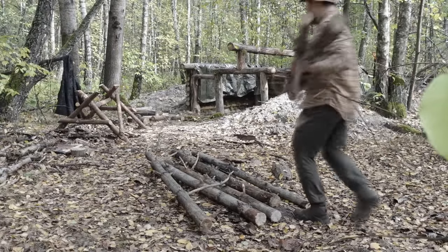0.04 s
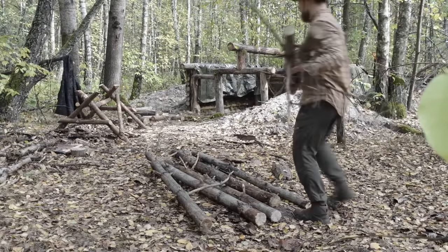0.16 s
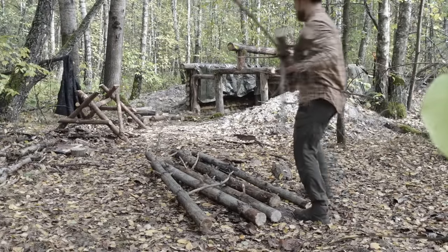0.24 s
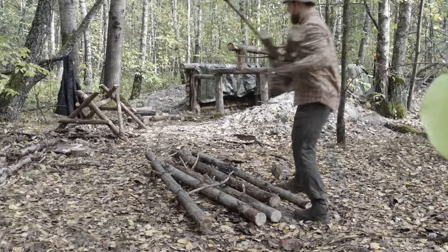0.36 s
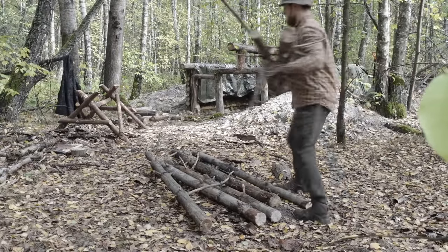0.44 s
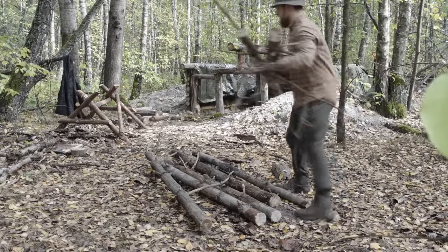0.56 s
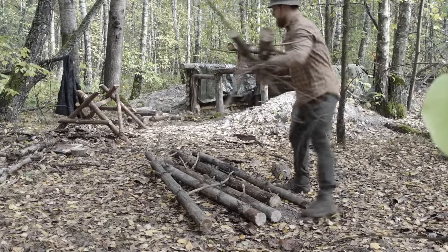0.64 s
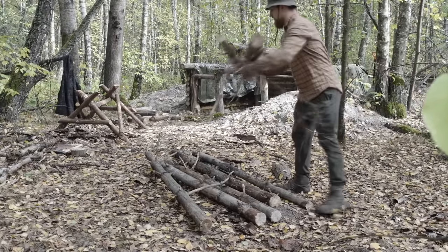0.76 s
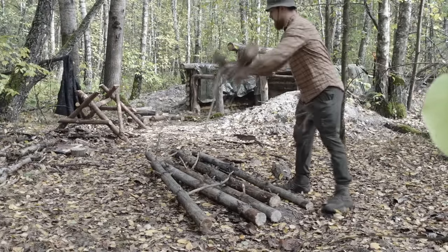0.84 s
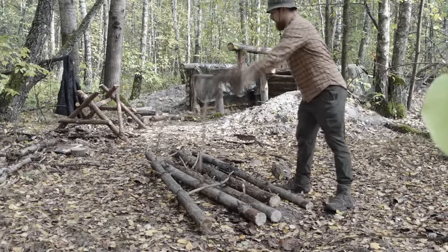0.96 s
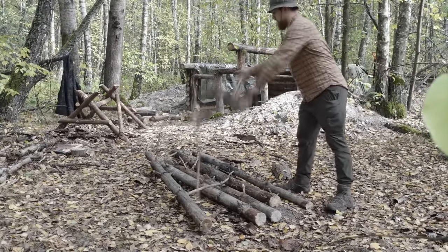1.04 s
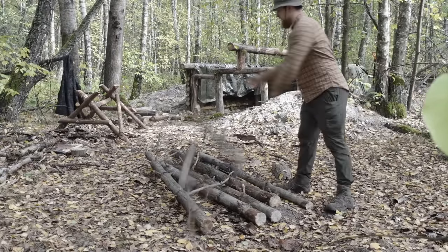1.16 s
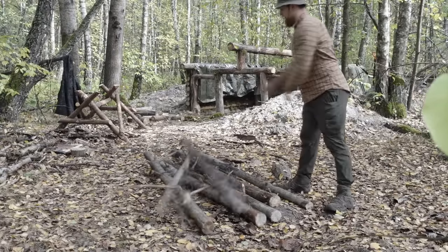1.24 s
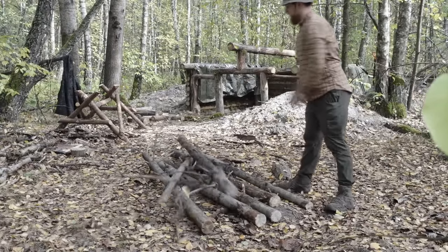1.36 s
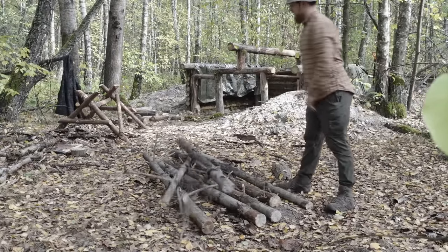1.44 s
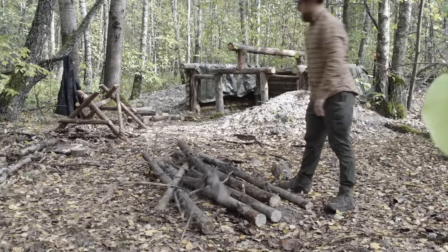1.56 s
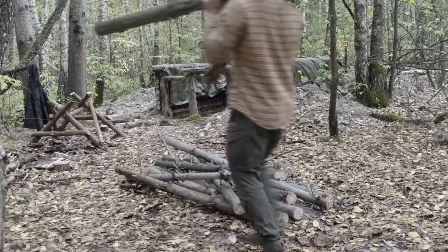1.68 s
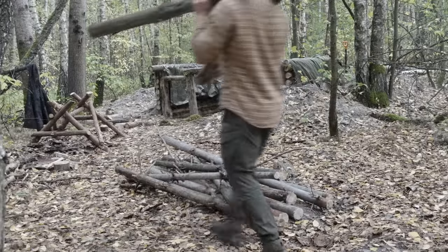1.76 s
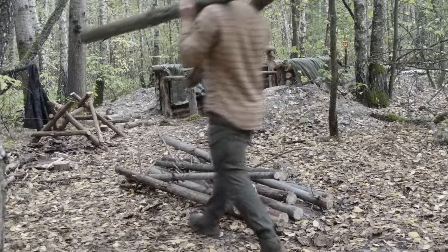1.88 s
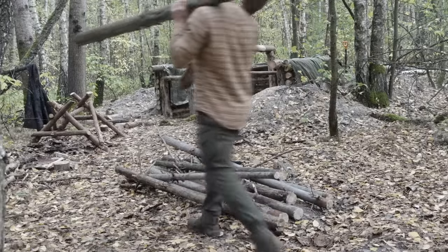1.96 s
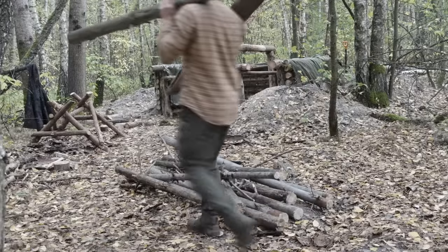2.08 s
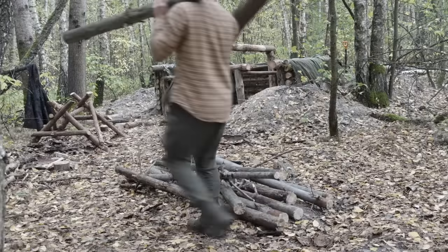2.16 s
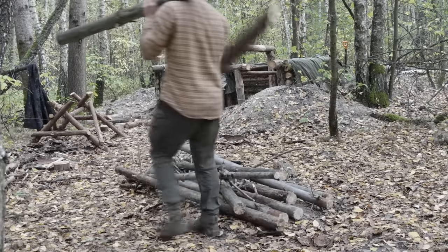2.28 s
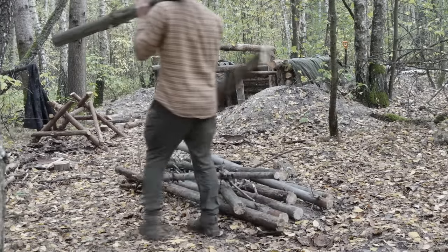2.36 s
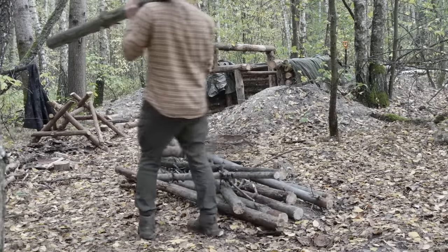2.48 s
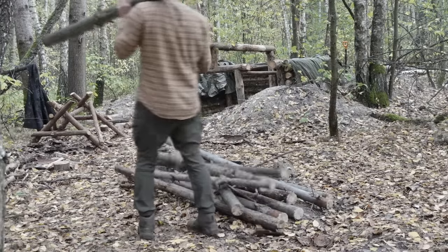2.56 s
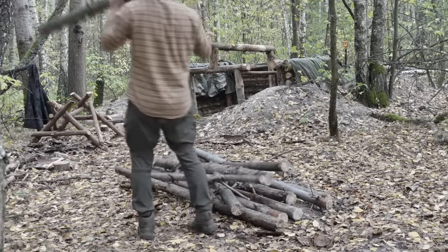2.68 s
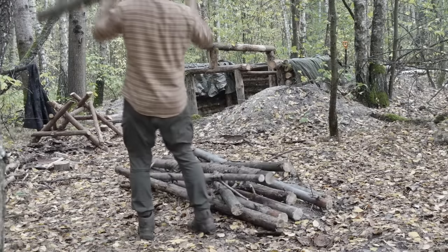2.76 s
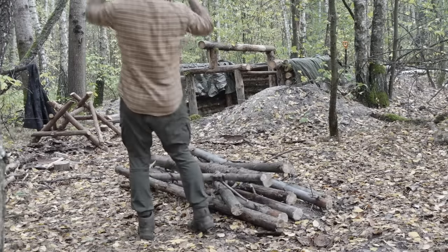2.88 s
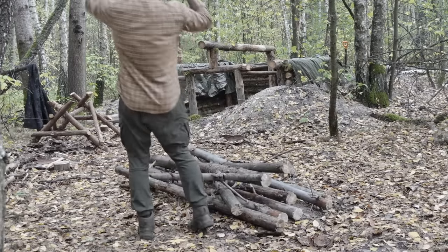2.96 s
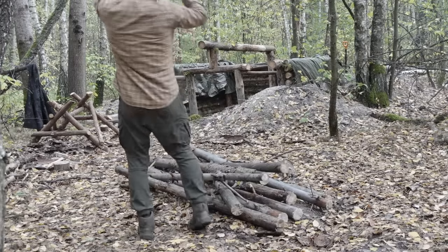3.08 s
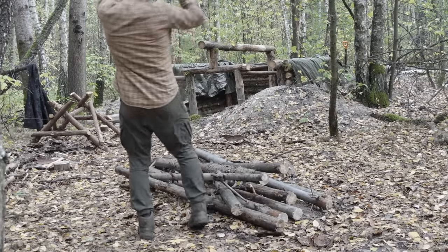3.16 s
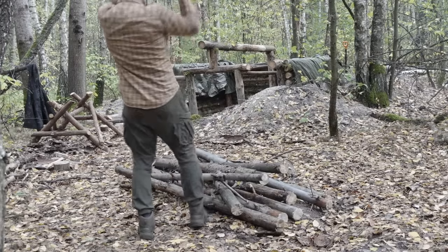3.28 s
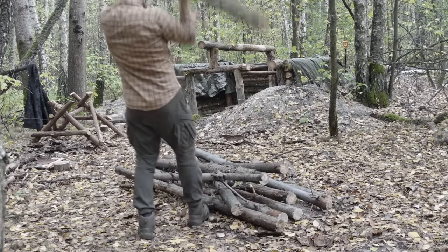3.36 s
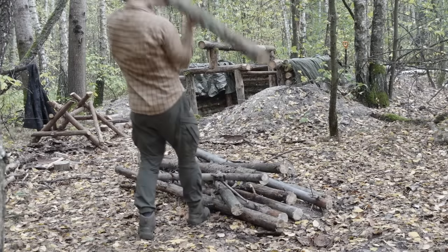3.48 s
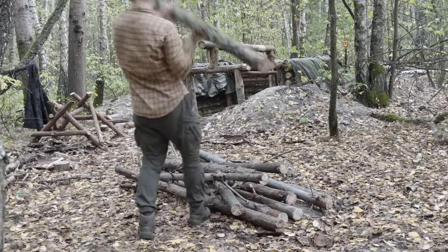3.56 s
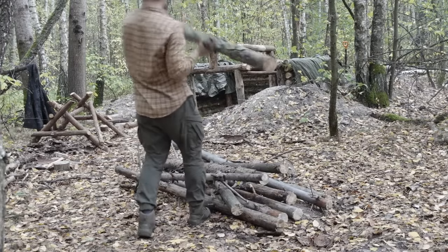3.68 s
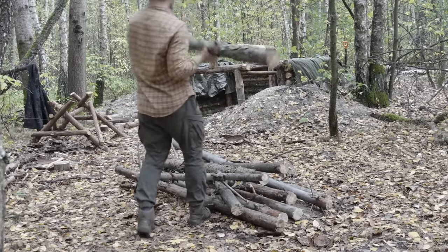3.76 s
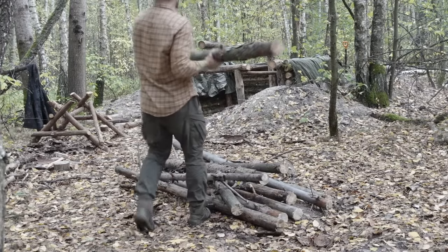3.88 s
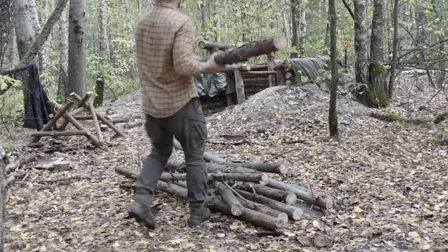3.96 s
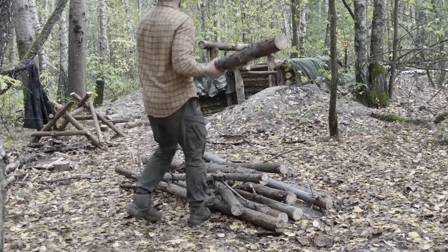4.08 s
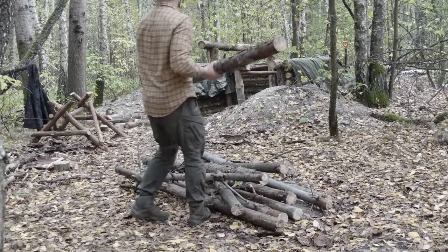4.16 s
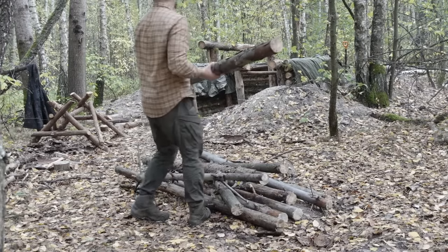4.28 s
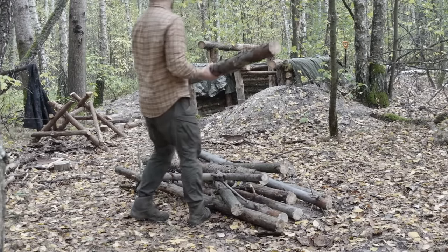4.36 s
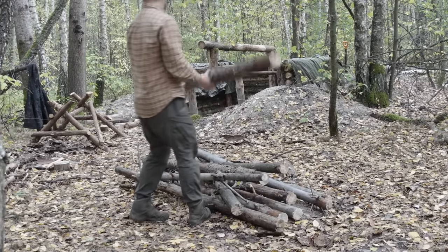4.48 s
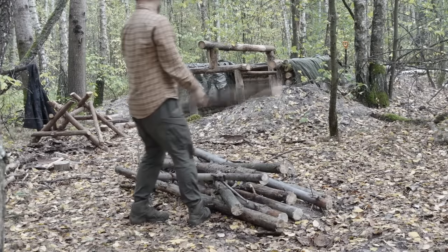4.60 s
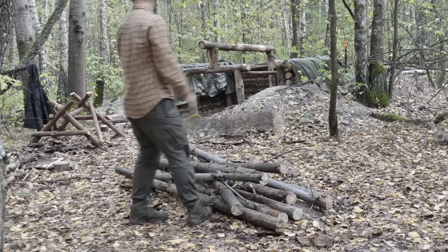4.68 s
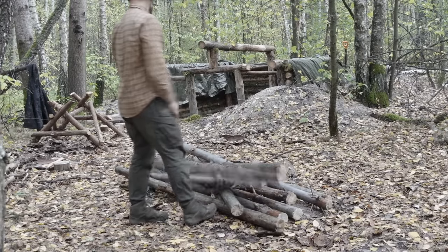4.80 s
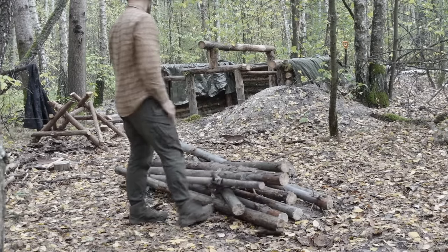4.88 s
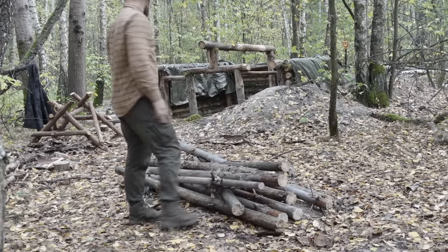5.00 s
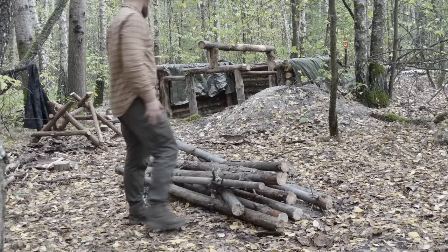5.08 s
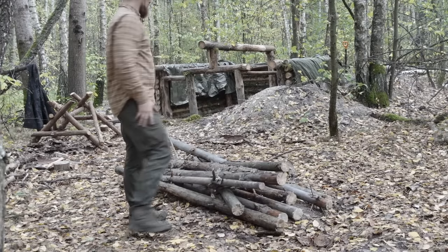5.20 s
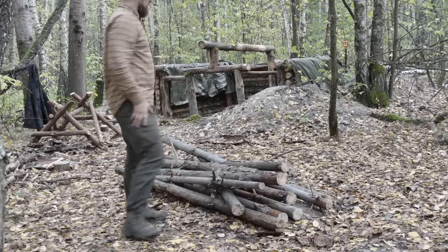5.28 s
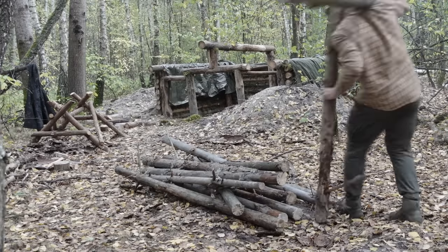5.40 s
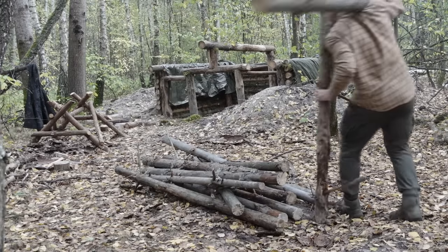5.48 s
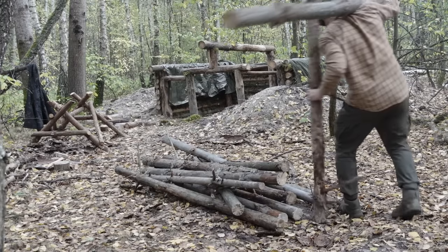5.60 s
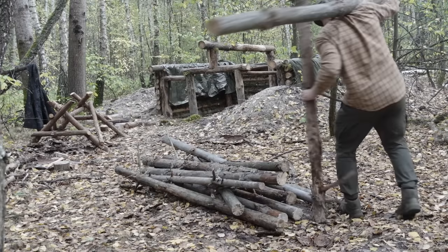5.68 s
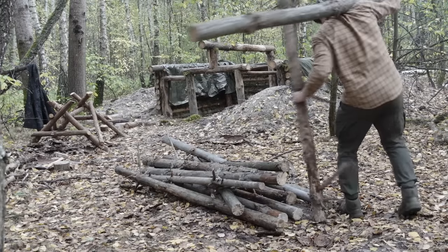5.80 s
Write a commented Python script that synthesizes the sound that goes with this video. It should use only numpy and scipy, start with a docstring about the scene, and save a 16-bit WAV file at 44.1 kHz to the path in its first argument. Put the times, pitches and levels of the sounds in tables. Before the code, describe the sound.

In a quiet forest, three logs are tossed one at a time onto a pile a few metres from the microphone. Each hits with a quick run of sharp, briefly ringing wooden knocks, a crackle of bark and a slight thud, followed by a short echo. The first two come close together and the last after a pause. Soft steps in dry leaves and a faint hush of air fill the gaps.

```python
"""Three loud wooden clatters: logs thrown one by one onto a pile in a forest, a few metres away.
Each log lands in a run of knocks that ring its bending modes and shake the pile, while bark cracks
at the contacts and the pile thuds on the soil. Boots and wood stir dry leaves, a log slides off a
shoulder, and the trunks scatter the blows back over a faint hush of air."""
import sys
import numpy as np
from scipy import signal
from scipy.fft import rfft, irfft
from scipy.io import wavfile

SR = 44100
rng = np.random.default_rng(int(sys.argv[2]) if len(sys.argv) > 2 else 0)


def pcm_store(signal):
    """Save signal as 16-bit PCM."""
    levels = np.round(np.clip(np.atleast_2d(signal), -1, 1) * 32767)
    wavfile.write(sys.argv[1], SR, levels.astype(np.int16).T)


N = 257544
TIME = np.arange(N) / SR
AGE = TIME[:SR]  # one second after a blow
MUTE_START_S, MUTE_END_S = 1.68, 2.5  # clatter silent between the first two throws


# Wood-on-wood contacts, harder is higher: start_s, level_db, pitch_hz, ring_db
LOG_KNOCKS = [ (0.445, -28.5, 606, -19.5), (0.462, -30, 1020, -29), (1.211, -29, 1330, -19),
              (1.242, -28, 754, -10.5), (1.2937, -0.5, 514, -19.5), (1.345, 1.5, 480, -9.5),
              (1.351, -6.5, 285, -16), (1.358, -8.5, 810, -14), (1.382, -5.5, 470, -27),
              (1.462, -17, 2940, -14), (1.4703, -13, 2120, -17), (1.476, -20.5, 730, -12.5),
              (1.607, -36, 430, -18), (1.666, -33.5, 700, -18), (2.519, -14, 298, -12.5),
              (2.535, -12.5, 840, -17), (2.55, -15, 840, -10), (2.617, -11, 470, -33),
              (2.6233, -3, 390, -19), (2.635, -11, 960, -10), (2.649, -3, 1880, -8.5),
              (2.664, -8.5, 855, -9.5), (2.693, -8.5, 540, -14), (2.7104, -10.5, 2050, -14),
              (2.7131, -3.5, 1370, -21.5), (2.748, -24, 1700, -16), (2.789, -18, 407, -23.5),
              (2.817, -26.5, 1450, -3.5), (2.893, -33.5, 1240, -15.5), (2.920, -32.5, 1340, -10.5),
              (3.116, -29, 1155, 4.5), (3.133, -34.5, 530, 6), (3.155, -35, 1084, -3),
              (4.890, -17, 724, -3.5), (4.896, -4, 570, -26), (4.908, -5.5, 1100, -9),
              (4.911, -6.5, 416, -9.5), (4.921, -4.5, 1390, -11), (4.9278, -1.5, 637, -14.5),
              (4.9333, -13, 785, -15), (4.950, -12.5, 525, -6), (4.970, -17.5, 1290, -38),
              (4.988, -19.5, 335, -8)]
# Bending and twisting modes of each thrown log: mode_hz, level_db, t60_s
FIRST_LOG_MODES = [(215.3, -12.5, 0.51), (271, 4.5, .19), (326, -14.5, 0.16), (374, -8.5, .15),
                   (442, 3, .18), (468.3, -5, 0.24), (652, -9, .16), (725, -9, 0.3), (839, 0.5, 0.1444),
                   (940.8, -10.5, .17), (1070, -6.5, 0.048), (1543, -16.5, .13), (2100, -5, 0.082),
                   (2530, -8, .11)]
SECOND_LOG_MODES = [(173, -9, 0.52), (234.2, -4, 0.39), (284, 4.5, .16), (333, -2, 0.069),
                    (399.5, -4, 0.55), (435, -7, .22), (502, 0.5, .15), (564, 4.5, 0.11), (694, -0.5, 0.24),
                    (1127, -1.5, 0.077), (1292, -8.5, 0.069), (1290, -1.5, 0.081), (1746, -9, 0.13),
                    (2270, -8.5, .12)]
THIRD_LOG_MODES = [(183.7, -17, .22), (345.3, -12, 0.39), (384, -8, 0.066), (452, -13.5, 0.18),
                   (537.2, 9, 0.091), (712, -15, 0.14), (834, -4, 0.16), (1140, 0.5, 0.068),
                   (1330, -5, 0.092), (1522, -14, 0.13), (1790, -4.5, 0.06), (1965, -7, .12),
                   (2125, -5.5, .09), (2440, -12, 0.063)]
# Modes of the logs bumping on the shoulder: mode_hz, level_db, t60_s
CARRIED_LOG_MODES = [(455, -5, 0.08), (564, -4, 0.15), (835, -16, 0.11), (1035, 1, 0.045),
                     (1310, -4.5, 0.039), (1492, -5, .08)]
# Handover to the next log: start_s
LOG_CHANGES_S = [2.0, 3.05, 4.0]

def logs():
    """Each knock rings the log moving at the time, which then rebounds."""
    modes_in_turn = (FIRST_LOG_MODES, SECOND_LOG_MODES, CARRIED_LOG_MODES, THIRD_LOG_MODES)
    out = np.zeros(N)
    for start_s, level_db, pitch_hz, ring_db in LOG_KNOCKS:
        modes = modes_in_turn[np.searchsorted(LOG_CHANGES_S, start_s)]
        add(out, start_s, undb(level_db) * (knock(pitch_hz, ring_db, modes) + rebounds(pitch_hz)))
    return out


def knock(pitch_hz, ring_db, modes, pile_db=-16, pile_t60_s=0.075, radiate_hz=215):
    """One blow: a short thock, the dense damped modes of the pile and the ring of the log."""
    cycles = 0.75 * max(pitch_hz / 500, 1) ** 0.3  # hard contacts swing for more cycles
    swing = AGE * pitch_hz / cycles
    thock = swing * np.exp((1 - swing ** 2) / 2) * sine(pitch_hz)
    onset = 1 - np.exp(-swing ** 2)
    pile = undb(pile_db) * band(rng.standard_normal(len(AGE)), pitch_hz, q=0.83) * fade(pile_t60_s)
    # a slim log radiates little bass
    highpass = signal.butter(3, radiate_hz, "high", fs=SR, output="sos")
    contact = signal.sosfilt(highpass, thock + onset * pile)
    # modes near the contact pitch are driven hardest
    ring = sum(undb(level_db) * resonance(mode_hz, pitch_hz, q=0.9) * fade(t60_s) * sine(mode_hz)
               for mode_hz, level_db, t60_s in modes)
    return contact + onset * undb(ring_db) * ring


def rebounds(pitch_hz, count=2, mean_gap_s=0.011, step_db=-12.5, spread_octaves=0.68):
    """The log chatters after a knock: quick, ever weaker contacts, too light to ring it."""
    rebound_hz = pitch_hz * 2 ** (spread_octaves * rng.uniform(-1, 1))
    gaps_s = mean_gap_s * rng.uniform(0.5, 1.5, count)
    contact = knock(rebound_hz, ring_db=0, modes=[])
    out = np.zeros(N)
    for k, start_s in enumerate(np.cumsum(gaps_s)):
        add(out, start_s, undb(step_db * (k + 0.5)) * contact)
    return out[:len(AGE)]


# Bark splitting, twigs snapping: start_s, level_db, centre_hz, length_s
BARK_CRACKS = [ (0.263, -42, 2060, 0.0038), (0.4627, -29, 2786, 0.0023), (1.21, -26.5, 4100, 0.0036),
               (1.233, -26.5, 4700, 0.023), (1.257, -23, 3900, 0.015), (1.316, -2, 5000, 0.0035),
               (1.323, -1.5, 5560, 0.00079), (1.339, -9, 2400, 0.0034), (1.354, -6, 6300, .004),
               (1.36, -7.5, 3800, 0.0039), (1.602, -33.5, 5880, 0.012), (2.529, -18.5, 3060, 0.0055),
               (2.6197, -1, 4170, 0.0053), (2.643, -8.5, 4850, 0.0082), (2.66, -5.5, 11000, 0.00044),
               (2.663, -15.5, 3200, 0.005), (3.424, -28, 2620, 0.0035), (3.604, -33.5, 6740, 0.00093),
               (4.533, -48.5, 6840, 0.0038), (4.742, -42, 7360, .0016), (4.887, -24, 6200, 0.013),
               (4.91, -7, 3220, 0.0037), (4.9182, -3, 4130, 0.0058), (4.932, -8.5, 2820, 0.0046),
               (4.945, -12.5, 2510, 0.0054)]
# Colour of cracking bark: freq_hz, gain_db
BARK_SPECTRUM = [(300, 21.5), (3300, -0.5), (4500, -4), (6000, -2), (7200, -7.5), (8700, -3),
                 (10200, -12.5), (13000, -3), (16000, -12)]

def bark(crush_db=-17, crush_hz=2900, crush_s=0.006, splinter_db=-17):
    """Breaking fibres build to a snap and trail splinters; every knock also crushes a little bark."""
    out, age = np.zeros(N), AGE[:SR // 10]
    crushes = [(start_s, level_db + crush_db, crush_hz, crush_s)
               for start_s, level_db, _, _ in LOG_KNOCKS]
    for start_s, level_db, centre_hz, length_s in BARK_CRACKS + crushes:
        clicks = grains(len(age), spread_db=3.5)
        fibres = colour(band(clicks, centre_hz, q=0.52), BARK_SPECTRUM)
        build = age / (0.47 * length_s)
        snap = build * np.exp(-build ** 2 / 2)
        splinters = undb(splinter_db) * np.minimum(build, 1) * np.exp(-age / (6.7 * length_s))
        add(out, start_s, undb(level_db) * fibres * (snap + splinters))
    return out


# Bounces of the whole pile: start_s, level_db, pitch_hz
PILE_THUDS = [(1.359, -27, 97), (2.528, -38, 65), (2.641, -36.5, 112), (4.912, -36.5, 134.6)]

def soil_thuds(rumble_db=-14, rumble_hz=48, rise_s=0.0034):
    """The pile bounces on soft ground and leaves a low rumble."""
    out = np.zeros(N)
    onset = 1 - np.exp(-AGE / rise_s)
    for start_s, level_db, pitch_hz in PILE_THUDS:
        bounce = sine(pitch_hz) * fade(t60_s=0.19)
        rumble = undb(rumble_db) * band(rng.standard_normal(len(AGE)), rumble_hz, q=0.4) * fade(t60_s=1)
        add(out, start_s, undb(level_db) * (bounce + rumble) * onset)
    return out


def stirred_leaves(below_thud_db=5, rise_s=0.024):
    """Each bounce of the pile throws up leaves, which then settle."""
    envelope = np.zeros(N)
    flurry = (1 - np.exp(-AGE / rise_s)) * fade(t60_s=0.8)
    for start_s, level_db, _ in PILE_THUDS:
        add(envelope, start_s, undb(level_db - below_thud_db) * flurry)
    return leaf_crunch() * envelope


# Scatter by band: freq_hz, early_db, early_t60_s, late_db, late_t60_s
ECHO_BANDS = [(60.3, 2, .35, -13, .9), (260, -3.5, 0.1, -26.5, .9), (700, -5.5, 0.24, -24, 1.2),
              (1990, -12, 0.1, -24, 1.5), (5520, -12, 0.41, -14.5, .8), (13000, -6.5, 0.33, -16.5, 0.32)]

def forest_echoes(x, build_s=0.0032):
    """Ground and trunks return a quick scatter and a faint tail, each fading by band."""
    scatter_spectrum = rfft(unit(grains(len(AGE), spread_db=2)))
    log_hz = np.log([row[0] for row in ECHO_BANDS])
    response = 0
    for selector, row in zip(np.eye(len(ECHO_BANDS)), ECHO_BANDS):
        _, early_db, early_t60_s, late_db, late_t60_s = row
        band_gain = np.interp(np.log(bins_hz(AGE)), log_hz, selector)
        scatter = irfft(scatter_spectrum * band_gain, len(AGE))
        early = undb(early_db) * unit(fade(early_t60_s))
        late = undb(late_db) * unit(fade(late_t60_s))
        response += scatter * np.hypot(early, late) / np.sqrt(len(AGE))
    onset = 1 - np.exp(-(AGE / build_s) ** 2)
    return signal.fftconvolve(x, response * onset)[:N]


# Boots shuffling: peak_s, level_db, time_constant_s
BOOT_STEPS = [(0.01, -50, 0.036), (0.11, -47.5, 0.022), (0.206, -51, 0.015), (0.441, -48.5, 0.053),
              (1.914, -42.5, .023), (2.16, -54, 0.045), (2.475, -43, 0.048), (3.25, -57, 0.18),
              (3.471, -52, 0.11), (4.02, -60, 0.027), (4.285, -57.5, 0.024), (4.611, -58.5, 0.024),
              (5.43, -54, 0.047), (5.821, -54, 0.11)]

def boots_in_leaves(litter_db=-63, wander_db=5.5):
    """Each step swells and fades in the leaves, over litter that never quite rests."""
    step_power = sum((undb(level_db) * np.exp(-abs(TIME - peak_s) / time_constant_s)) ** 2
                     for peak_s, level_db, time_constant_s in BOOT_STEPS)
    litter = undb(litter_db + wander_db * wander(rate_hz=12))
    return leaf_crunch() * np.sqrt(step_power + litter ** 2)


# Colour of dry leaves: freq_hz, gain_db
LEAF_SPECTRUM = [(100, 0.5), (400, -0.5), (1500, 0.5), (5000, -3.5), (8700, -3.5), (10000, -12),
                 (13000, -7.5), (16000, -21)]

def leaf_crunch(burst_db=2.2):
    """Dry leaves breaking in uneven bursts, at rms 1."""
    bursts = grains(N, spread_db=4.2) * undb(burst_db * wander(rate_hz=140))
    return colour(bursts, LEAF_SPECTRUM)


# Colour of bark rubbing on a shirt: freq_hz, gain_db
SLIDE_SPECTRUM = [(100, -10.5), (500, -7), (1100, -2.5), (1800, -4), (3000, -10), (8700, -10.5),
                  (10000, -19.5), (13000, -13), (16000, -24)]

def shoulder_slide(peak_s=0.81, level_db=-47.5, half_width_s=0.19, roughness_db=1.9):
    """A log slides off the shoulder: a fine rasp that swells and fades."""
    rasp = grains(N, spread_db=3) * undb(roughness_db * wander(rate_hz=70))
    swell = np.exp(-((TIME - peak_s) / half_width_s) ** 2)
    return colour(rasp, SLIDE_SPECTRUM) * undb(level_db) * swell


# Colour of distant air: freq_hz, gain_db
HUSH_SPECTRUM = [(15, -36.5), (25, -3.5), (39, -5), (111, -11), (149, -16), (373, -3.5), (911, -4),
                 (1260, -9), (1740, -12), (5280, -16), (5730, -14.5), (11300, -30), (14800, -35.5),
                 (16000, -33)]

def treetop_hush(early_db=-63, late_db=-55.5, waver_db=0.5):
    """Air wavers in the treetops; the level steps up as the first clatter cuts off."""
    air = colour(rng.standard_normal(N), HUSH_SPECTRUM)
    level_db = np.where(TIME < MUTE_START_S, early_db, late_db)
    return air * undb(level_db + waver_db * wander(rate_hz=6.7))


def undb(db):
    """Decibels to gain."""
    return 10 ** (np.asarray(db) / 20)


def unit(x):
    """Scale to rms 1."""
    return x / np.sqrt(np.mean(x ** 2))


def sine(hz):
    """One second of a pure tone."""
    return np.sin(2 * np.pi * hz * AGE)


def fade(t60_s):
    """One second of exponential decay."""
    return np.exp(-np.log(1000) * AGE / t60_s)


def add(out, start_s, x):
    """Mix x into out from start_s."""
    i = int(start_s * SR)
    out[i:i + len(x)] += x[:N - i]


def bins_hz(x):
    """FFT bin frequencies of x, kept above zero."""
    return np.maximum(np.fft.rfftfreq(len(x), 1 / SR), 1)


def colour(x, spectrum):
    """Filter x by (freq_hz, gain_db) points, at rms 1."""
    freq_hz, gain_db = np.transpose(spectrum)
    gain = undb(np.interp(np.log(bins_hz(x)), np.log(freq_hz), gain_db))
    return unit(irfft(rfft(x) * gain, len(x)))


def resonance(hz, centre_hz, q):
    """Gain of a resonance at hz."""
    return 1 / np.sqrt(1 + (q * (hz / centre_hz - centre_hz / hz)) ** 2)


def band(x, centre_hz, q):
    """Pass x through a resonance twice, at rms 1."""
    return unit(irfft(rfft(x) * resonance(bins_hz(x), centre_hz, q) ** 2, len(x)))


def grains(n, spread_db):
    """Dense tiny clicks, a few much larger than the rest."""
    return rng.standard_normal(n) * undb(spread_db * np.minimum(rng.exponential(size=n), 4.5))


def wander(rate_hz):
    """Random drift with a spread near 1."""
    points = rng.standard_normal(1024)
    return np.interp(TIME * rate_hz, np.arange(len(points)), points)


def scene(cutoff_s=0.005):
    """Clatter, echoes and stirred leaves, cut short after the first throw, over boots, slide and hush."""
    clatter = logs() + bark() + soil_thuds()
    landings = clatter + forest_echoes(clatter) + stirred_leaves()
    gate = 1 - np.clip((TIME - MUTE_START_S) / cutoff_s, 0, 1) * (TIME < MUTE_END_S)
    return (landings * gate + boots_in_leaves() + shoulder_slide() + treetop_hush())[None]


def record(dry, top_hz=16000):
    """The loudest peaks clip; a steep low-pass cuts the top."""
    lowpass = signal.ellip(10, 0.2, 70, top_hz, fs=SR, output="sos")
    return signal.sosfilt(lowpass, np.clip(dry, -1, 1))


dry = scene()
out = record(dry)
pcm_store(out)
```